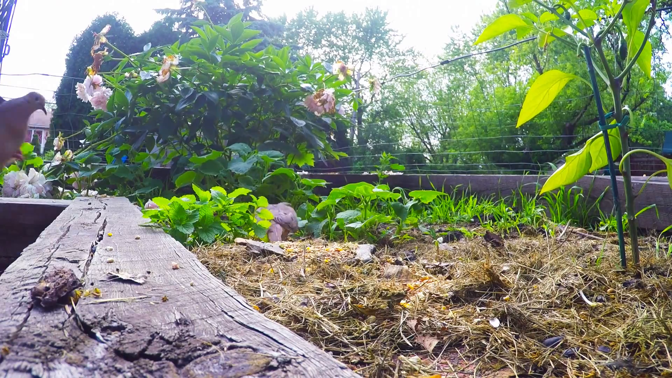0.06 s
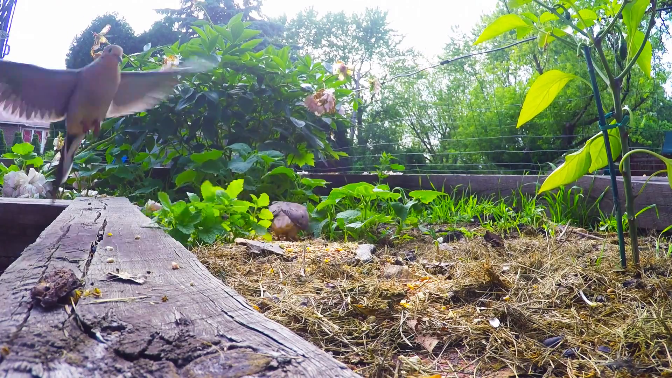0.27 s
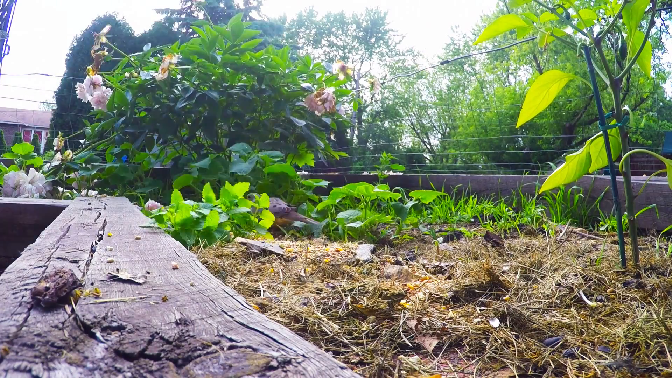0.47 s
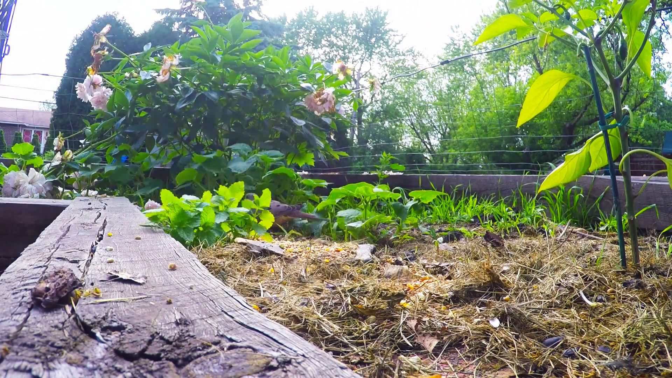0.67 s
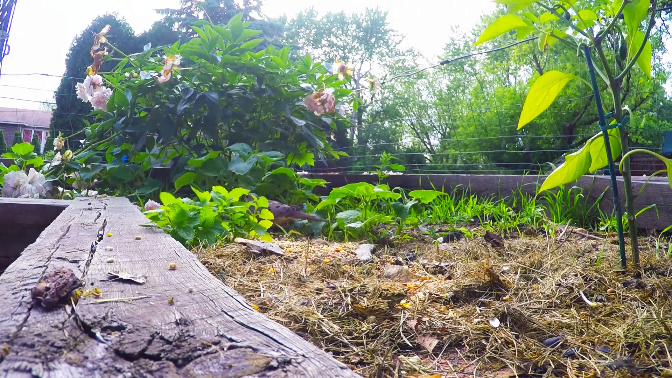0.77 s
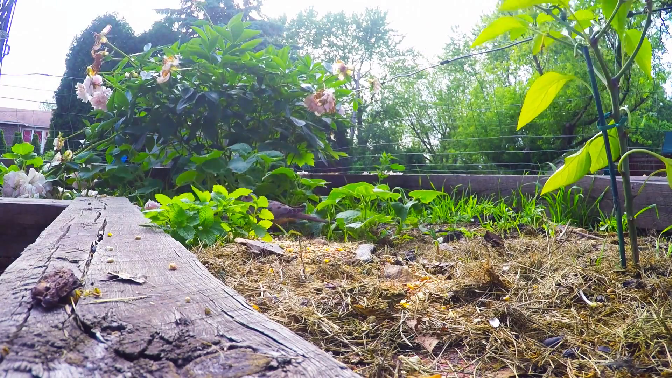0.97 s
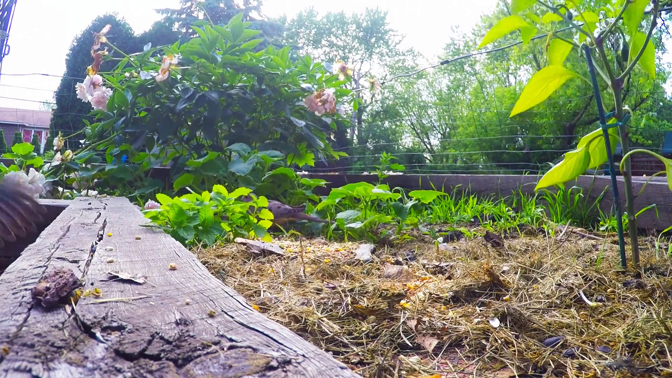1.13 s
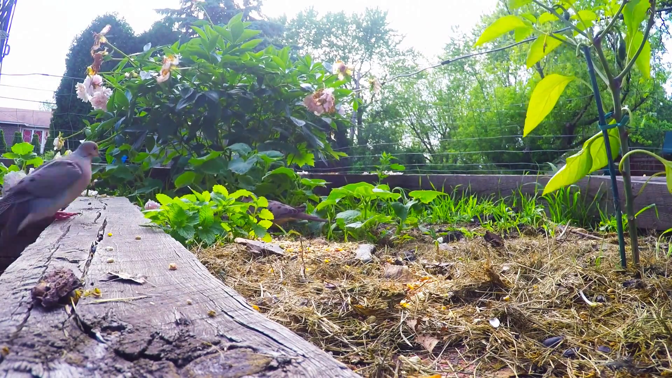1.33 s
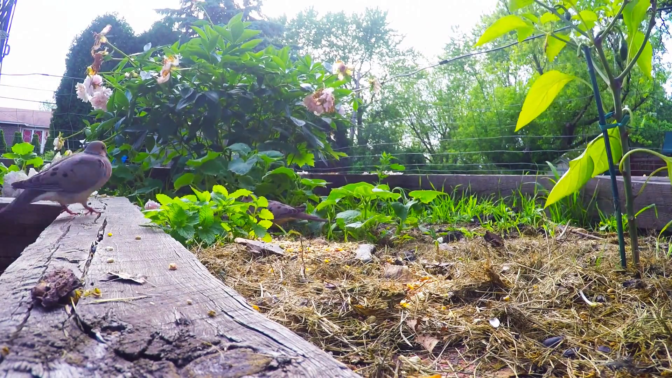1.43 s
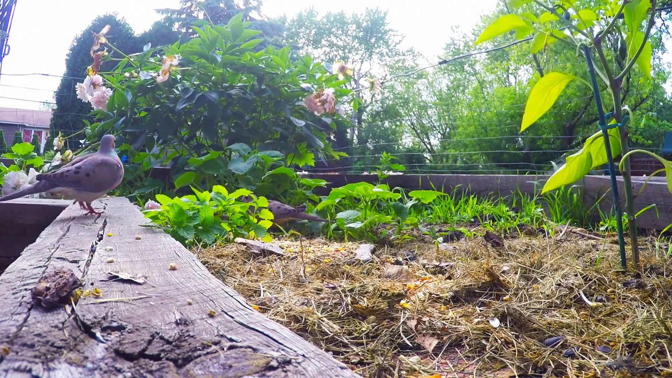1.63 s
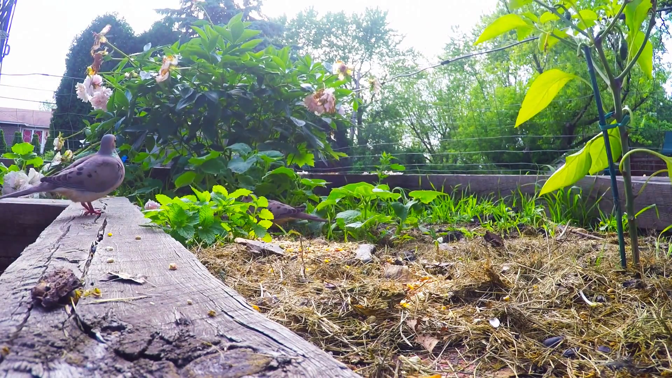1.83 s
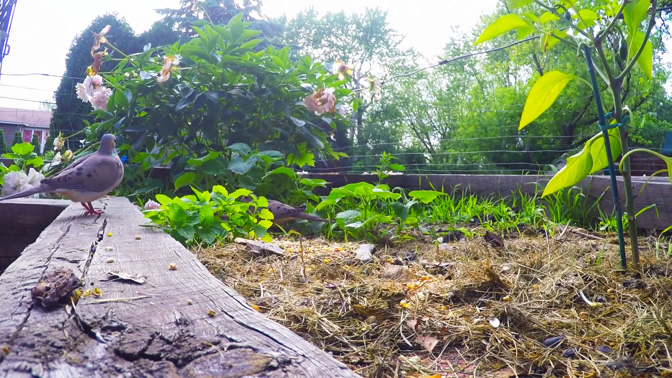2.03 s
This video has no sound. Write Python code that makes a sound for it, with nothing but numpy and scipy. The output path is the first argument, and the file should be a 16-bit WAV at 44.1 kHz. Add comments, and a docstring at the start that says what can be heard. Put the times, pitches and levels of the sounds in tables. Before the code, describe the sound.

A dove's wings flutter very close to the microphone, rapid breathy whistles with feather swishes and low thumping air buffets, then slower beats and light taps as it settles; faint outdoor rumble and a distant bird chirp.

```python
"""A dove flutters in and lands on a garden timber, close to the microphone.
Each downstroke makes the flight feathers whistle: breathy harmonics whose pitch follows a short arch.
Crackling noise makes the swishes and flicks, low pressure dips and eddies the buffets at the microphone.
The beats slow as it settles. Far off, a small bird chirps in gliding tones;
behind it lie a low rumble and soft hiss of coloured noise and a wavering drone."""
import sys
import numpy as np
from scipy import signal
from scipy.fft import rfft, irfft
from scipy.io import wavfile
from scipy.ndimage import uniform_filter1d

SR = 44100
rng = np.random.default_rng(int(sys.argv[2]) if len(sys.argv) > 2 else 0)


def wav_out(sig):
    """Save sig, one row per channel (or a flat mono array), as 16-bit PCM at SR to the path in sys.argv[1]."""
    wavfile.write(sys.argv[1], SR, np.round(np.clip(np.atleast_2d(sig).T, -1, 1) * 32767).astype(np.int16))


N = 92610  # samples, 2.1 s

# Far background, outdoor rumble: [f/Hz, relative level/dB]
RUMBLE_COLOUR = [(12, -64), (20, -64), (44, 2), (97, -9), (110, -10), (123, -15), (162, -21), (211, -23.5),
                 (248, -25.5), (282, -31.5), (400, -42.5), (520, -36), (880, -120)]
# Far background, soft hiss of air: [f/Hz, relative level/dB]
HISS_COLOUR = [(240, -72), (400, 4), (432, -4.5), (458, -4.5), (964, -5.5), (1170, -5.5), (1330, -8),
               (2540, -8.5), (4390, -10.5), (15000, -24)]
# Distant songbird's notes: [start t/s, length t/s, start f/Hz, middle f/Hz, end f/Hz, level/dB before trim]
BIRD_NOTES = [(.705, .045, 5850, 5350, 4800, -64), (.940, .09, 3400, 3350, 3340, -66),
              (1.500, .048, 4200, 4020, 4300, -61), (1.527, .050, 1900, 2550, 3600, -57),
              (1.560, .085, 3600, 3250, 2550, -56), (1.566, .06, 4200, 3850, 3300, -58)]
# Buffets of air at the microphone: [centre t/s, width t/s, dip level/dB before the low cut]
AIR_BUFFETS = [(0.073, 0.011, -29), (0.202, 0.017, -22), (0.237, 0.005, -22.5), (0.277, 0.017, -13.5),
               (0.293, 0.0045, -18), (0.38, 0.00655, -17.5), (.428, 0.0077, -21.5), (0.469, 0.0061, -10),
               (0.557, 0.0052, -7), (0.645, 0.0079, -13), (.789, .0085, -16), (.822, .008, -19.5),
               (.921, .008, -16.5), (1.043, .009, -20.5), (1.149, 0.0043, -30), (1.212, 0.015, -22)]
# Eddies at the microphone: [f/Hz, relative level/dB]
EDDY_SPECTRUM = [(18, 3.5), (35, 1), (80, -9), (130, -19.5), (300, -42.5), (800, -53)]
# Close swishes of air through the feathers:
# [peak t/s, rise t/s, fall t/s, relative level/dB, extra treble level/dB]
FEATHER_SWISHES = [(0.093, 0.051, 0.029, -53.5, 1.5), (0.201, 0.015, 0.058, -50, 1),
                   (0.239, 0.018, .02, -43.5, -22), (0.276, 0.038, 0.036, -48.5, -2),
                   (0.366, 0.035, 0.036, -49.5, -1.5), (0.456, 0.033, 0.029, -52.5, 6),
                   (0.548, 0.019, 0.011, -51, 9), (0.631, 0.046, 0.027, -49.5, 3),
                   (0.795, 0.017, 0.017, -51, 8), (0.928, 0.03, 0.027, -55, 6),
                   (1.046, 0.018, 0.027, -53, 4), (1.204, 0.049, 0.039, -53.5, -0.5),
                   (1.137, 0.013, 0.009, -61.5, -2), (1.291, 0.013, .015, -63.5, 4.5),
                   (1.40, 0.039, 0.016, -57, -1)]
# Smooth air in a swish: [f/Hz, relative level/dB]
SWISH_SPECTRUM = [(150, 10), (400, 6.5), (700, 1.5), (1100, -5), (1800, 2.5), (3000, -3.5), (5500, -7.5),
                  (8000, -13), (12000, -15.5), (16000, -17)]
# Close feather flicks and taps of the feet: [centre t/s, length t/s from peak to 1/e, level/dB]
FEATHER_FLICKS = [(.056, .003, -53), (.254, .0015, -37), (.338, .002, -43), (.426, .002, -45),
                  (.512, .003, -45), (.599, .003, -45), (.639, .004, -44), (.768, .003, -46),
                  (.835, .002, -54), (.904, .003, -49), (1.031, .001, -53), (1.181, .003, -52),
                  (1.235, .004, -48), (1.134, .002, -50), (1.343, .002, -58), (1.370, .002, -55),
                  (1.533, .001, -53)]
# Flicks, taps and crackle: [f/Hz, relative level/dB]
FLICK_SPECTRUM = [(200, 6), (800, 2), (1800, -2), (3500, -4.5), (6000, -10), (9000, -14.5), (16000, -19)]
# Lower whistles of the turning wing: [centre t/s, length t/s, highest f/Hz, level/dB]
TURNING_WHISTLES = [(.068, .015, 1300, -44), (.187, .012, 1330, -51), (.325, .04, 980, -54),
                    (.347, .014, 1350, -51), (.418, .028, 1020, -47), (.436, .016, 1300, -47),
                    (.500, .026, 1020, -55), (.239, .022, 1230, -36), (.251, .012, 1000, -45),
                    (.292, .011, 1400, -46), (.640, .018, 660, -51), (.813, .012, 1260, -46.5)]
# Downstroke whistles, close: [start t/s, length t/s, loudest at share of length, level/dB before trim,
# start f/Hz, top f/Hz, end f/Hz, top at share of length, octave relative level/dB, roughness 0-1]
DOWNSTROKE_WHISTLES = [ (.068, .038, .45, -40, 1880, 2000, 1850, .55, -15, .2),
                       (.185, .035, .58, -35.5, 1750, 2320, 1600, .54, -15, .55),
                       (.257, .039, .55, -40, 1950, 2200, 1650, .5, -9, .7),
                       (.348, .032, .66, -40, 1980, 2150, 1950, .55, -1, .35),
                       (.429, .040, .82, -41, 2030, 2130, 1600, .5, -4, .6),
                       (.520, .038, .68, -32, 2020, 2090, 1520, .6, -9, .25),
                       (.603, .040, .68, -34, 1970, 2070, 1850, .62, -6, .35),
                       (.780, .035, .5, -31.5, 1750, 2060, 1800, .57, -11, .5),
                       (.909, .041, .47, -35, 1760, 2020, 1850, .8, -14, .22),
                       (1.035, .043, .14, -42, 1800, 1950, 1860, .62, -15, .22),
                       (1.193, .027, .17, -35, 1700, 2080, 1620, .33, -8, .45)]
# Third, fourth and fifth harmonic of those whistles: [level/dB relative to the fundamental]
UPPER_HARMONICS_DB = [-15.5, -23.5, -27.5]

RUMBLE_DB, HISS_DB = -40.5, -64
RUMBLE_STEADY = 0.2  # share of the rumble's slow level changes that is evened out
DRONE_HZ, DRONE_DB, DRONE_ROUGH = 98.3, -44, 0.12
CHIRP_TRIM_DB, CHIRP_ROUGH = -0.5, 0.184
CHIRP_LOUDEST = .32  # share of a note's length, counted from its high end
CHIRP_ECHO_DB, CHIRP_ECHO_T60_S = -5, .22
BUFFET_LOW_CUT_HZ = 25.9
EDDY_DB, EDDY_S = -18, .03  # eddy level relative to its buffet, spread in time
WAKE_DB, WAKE_PEAK_S, WAKE_SPREAD_S = -37.5, 0.93, 0.56
SWISH_SPLIT_HZ = 2200  # body below, treble above
GRAIN_DB, GRAIN_HZ = 2.5, 400  # spread and rate of the swish's level flicker
CRACKLE_PER_S, CRACKLE_DECAY_S = 260, 0.00069
CRACKLE_DB, CRACKLE_SPREAD_DB = -8, 6.5
LOW_ROUGH, LOW_SAG = .8, .22  # sag: share of pitch lost at both ends
WHISTLE_TRIM_DB, ARCH_POWER = -1.5, 1.9
BREATHY, BREATHY_HZ = .33, 450
FLUTTER_HZ, FLUTTER_DEPTH, PITCH_JITTER = 242, 0.6, 0.0435  # both amounts at roughness 1
RISE_POWER, FALL_POWER = 1.25, .8
GARDEN_T60_S, GARDEN_DB = 0.085, -20.5
TOP_HZ = 15500


def undb(db):
    """Decibels to gain."""
    return 10 ** (np.asarray(db) / 20)


def clock():
    """Time of every sample in seconds."""
    return np.arange(N) / SR


def noise(colour):
    """Noise of rms 1 shaped by spectrum points, falling 36 dB per octave outside them."""
    hz, db = np.array(colour, float).T
    octave = np.log2(np.maximum(np.arange(N // 2 + 1) * SR / N, 1))
    outside = np.abs(octave - np.clip(octave, np.log2(hz[0]), np.log2(hz[-1])))
    gain = undb(np.interp(octave, np.log2(hz), db) - 36 * outside)
    x = irfft(rfft(rng.standard_normal(N)) * gain, N)
    return x / x.std()


def wander(hz):
    """Smooth random course of spread 1, its spectrum fading out around hz."""
    f = np.arange(N // 2 + 1) * SR / N
    x = irfft(rfft(rng.standard_normal(N)) * np.exp(-(f / hz) ** 2), N)
    return x / x.std()


def skewed(u, top):
    """Position in an event: -1 at its start, 0 at the top, 1 at its end."""
    top = np.clip(top, .05, .95)
    from_top = u - top
    return np.clip(np.where(u < top, from_top / top, from_top / (1 - top)), -1, 1)


def swell(u, top):
    """Loudness of an event: a gradual rise and a rounder, more sudden fall."""
    position = skewed(u, top)
    power = np.where(position < 0, RISE_POWER, FALL_POWER)
    return np.abs(np.cos(np.pi / 2 * position)) ** power


def flutter(hz, rough):
    """Phase and strength of a tone that shakes in pitch and level."""
    shaken_hz = hz * (1 + PITCH_JITTER * rough * wander(FLUTTER_HZ))
    phase = 2 * np.pi * np.cumsum(shaken_hz) / SR
    depth = FLUTTER_DEPTH * rough
    strength = (1 + depth * wander(FLUTTER_HZ)) / np.sqrt(1 + depth ** 2)
    return phase, strength


def echo(x, t60, db):
    """Adds the diffuse scatter from plants and fences as a decaying noise tail."""
    tail = rng.standard_normal(N) * undb(-60 * clock() / t60)
    scatter = signal.fftconvolve(x, tail / np.linalg.norm(tail))[:N]
    return x + undb(db) * scatter


def garden():
    """Far background: an even low rumble, a wavering far-off drone and a soft hiss."""
    rumble = noise(RUMBLE_COLOUR)
    slow_power = uniform_filter1d(rumble ** 2, size=SR // 12)
    rumble = rumble / slow_power ** (RUMBLE_STEADY / 2)
    drone_hz = DRONE_HZ * (1 + 0.0309 * wander(5.68))
    drone = np.sin(2 * np.pi * np.cumsum(drone_hz) / SR) * (1 + DRONE_ROUGH * wander(10))
    hiss = undb(HISS_DB + 0.18 * wander(18)) * noise(HISS_COLOUR)
    return undb(RUMBLE_DB) * rumble + undb(DRONE_DB) * drone + hiss


def songbird():
    """Far off: faint gliding notes, loudest near their high end and blurred by distance."""
    t, out = clock(), np.zeros(N)
    for start, length, start_hz, middle_hz, end_hz, db in BIRD_NOTES:
        u = np.clip((t - start) / length, 0, 1)
        glide_hz = np.interp(2 * u, [0, 1, 2], [start_hz, middle_hz, end_hz])
        phase, shake = flutter(glide_hz, CHIRP_ROUGH)
        loudest = CHIRP_LOUDEST if end_hz < start_hz else 1 - CHIRP_LOUDEST
        out += undb(db + CHIRP_TRIM_DB) * swell(u, loudest) * shake * np.sin(phase)
    return echo(out, CHIRP_ECHO_T60_S, CHIRP_ECHO_DB)


def buffets():
    """At the microphone: each beat sends a dip of pressure past, then eddies that linger as a wake."""
    t, dips, stir = clock(), np.zeros(N), np.zeros(N)
    for at, width, db in AIR_BUFFETS:
        u = (t - at) / width
        dips += undb(db) * (u ** 2 - 1) * np.exp(-u ** 2 / 2)
        stir += undb(db) * np.exp(-((t - at) / EDDY_S - .5) ** 2)  # strongest just after the dip
    low_cut = signal.butter(2, BUFFET_LOW_CUT_HZ, "high", fs=SR, output="sos")
    gusts = signal.sosfilt(low_cut, dips)
    wake = undb(WAKE_DB) * np.exp(-((t - WAKE_PEAK_S) / WAKE_SPREAD_S) ** 2)
    return gusts + (undb(EDDY_DB) * stir + wake) * noise(EDDY_SPECTRUM)


def feather_crackle():
    """Vanes slip over each other: random small bursts of uneven strength that die away at once."""
    starts = rng.random(N) < CRACKLE_PER_S / SR
    slip_db = CRACKLE_SPREAD_DB * np.minimum(rng.exponential(size=N), np.pi)
    decay = np.exp(-1 / (CRACKLE_DECAY_S * SR))
    crackle = signal.lfilter([1], [1, -decay], starts * undb(slip_db)) * noise(FLICK_SPECTRUM)
    return undb(CRACKLE_DB) * crackle / crackle.std()


def swishes():
    """Air through the feathers: grainy, crackling noise swells and fades with the speed of the wing."""
    t, out = clock(), np.zeros(N)
    crackle = feather_crackle()
    smooth_air = noise(SWISH_SPECTRUM)
    grain = undb(GRAIN_DB * wander(GRAIN_HZ) - 3.5)
    air = smooth_air * grain + crackle
    body = signal.sosfiltfilt(signal.butter(2, SWISH_SPLIT_HZ, fs=SR, output="sos"), air)
    treble = air - body
    for at, rise, fall, db, treble_db in FEATHER_SWISHES:
        u = (t - at) / np.where(t < at, rise, fall)
        speed = 1 / np.cosh(np.clip(u * np.sqrt(2), -20, 20))
        out += undb(db) * speed * (body + undb(treble_db) * treble)
    return out


def flicks():
    """Feathers or feet touch: very brief bursts of noise."""
    t = clock()
    touch = sum(undb(db) * np.exp(-((t - at) / length) ** 2) for at, length, db in FEATHER_FLICKS)
    return touch * noise(FLICK_SPECTRUM)


def low_whistles():
    """Slower air, as the wing turns over, sounds a lower and plainer note."""
    t, out = clock(), np.zeros(N)
    for centre, length, hz, db in TURNING_WHISTLES:
        u = np.clip((t - centre) / length + 1 / 2, 0, 1)
        sagging_hz = hz * (1 - LOW_SAG * (2 * u - 1) ** 2)
        phase, shake = flutter(sagging_hz, LOW_ROUGH)
        out += undb(db) * np.sin(np.pi * u) * shake * np.sin(phase)
    return out


def breath(harmonic):
    """Ragged complex strength of rms 1 for one harmonic; higher harmonics are breathier."""
    amount = BREATHY * np.sqrt(harmonic - 1 + 0.19)
    ragged = 1 + amount * (wander(BREATHY_HZ) + 1j * wander(BREATHY_HZ))
    return ragged / np.sqrt(np.mean(np.abs(ragged) ** 2))


def wing_whistles():
    """The feather tips sing with breathy harmonics; the pitch arches with the speed of the wing."""
    t, out = clock(), np.zeros(N)
    breaths = [breath(h) for h in range(1, len(UPPER_HARMONICS_DB) + 3)]
    for start, length, loudest, db, start_hz, top_hz, end_hz, top, octave_db, rough in DOWNSTROKE_WHISTLES:
        u = (t - start) / length
        arch = skewed(u, top)
        foot_hz = np.where(arch < 0, start_hz, end_hz)
        hz = top_hz + (foot_hz - top_hz) * np.abs(arch) ** ARCH_POWER
        phase, shake = flutter(hz, rough)
        on = (u > 0) & (u < 1)
        tone = 0
        for k, harmonic_db in enumerate([0, octave_db, *UPPER_HARMONICS_DB]):
            harmonic = breaths[k][on] * np.exp(1j * (k + 1) * phase[on])
            tone = tone + undb(harmonic_db) * harmonic.imag
        out[on] += undb(db + WHISTLE_TRIM_DB) * swell(u[on], loudest) * shake[on] * tone
    return out


def scene():
    """The dove close by, the garden behind it."""
    dry_wings = wing_whistles() + low_whistles() + swishes() + flicks()
    wings = echo(dry_wings, GARDEN_T60_S, GARDEN_DB)
    return (wings + buffets() + songbird() + garden())[None]


def record(dry):
    """The recorder cuts the top steeply."""
    return signal.sosfilt(signal.ellip(10, .2, 80, TOP_HZ, fs=SR, output="sos"), dry)


dry = scene()
out = record(dry)
wav_out(out)
```